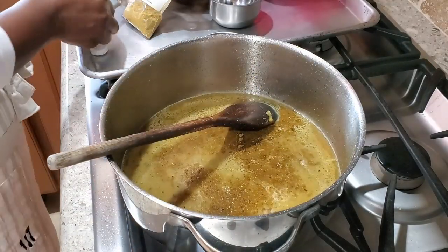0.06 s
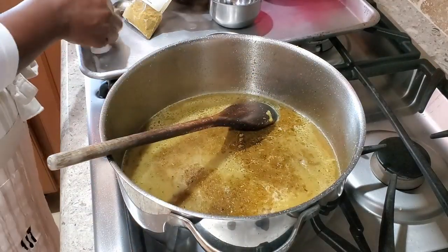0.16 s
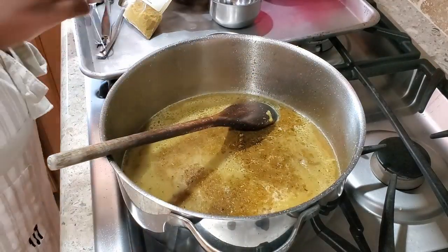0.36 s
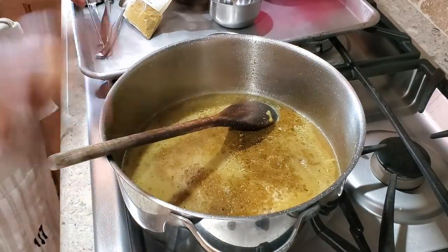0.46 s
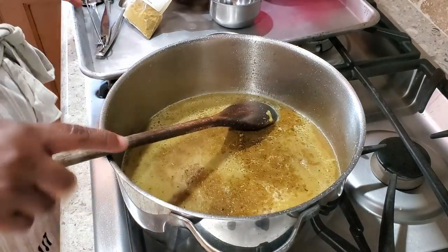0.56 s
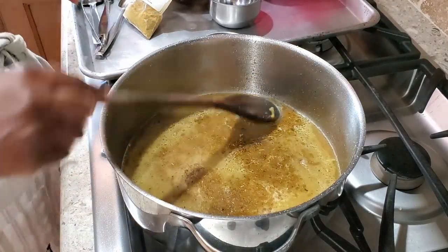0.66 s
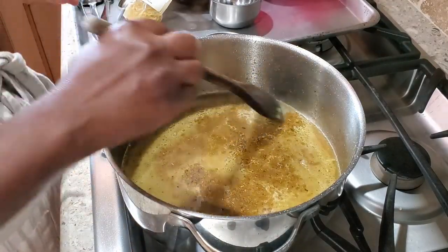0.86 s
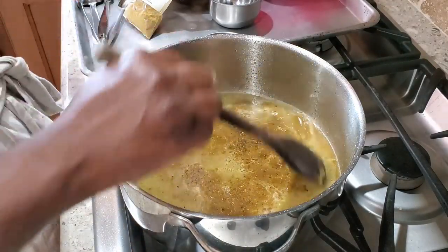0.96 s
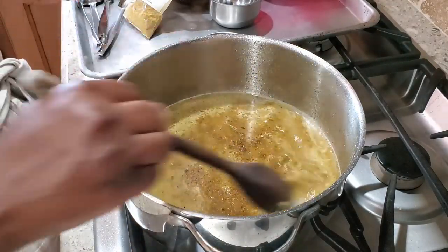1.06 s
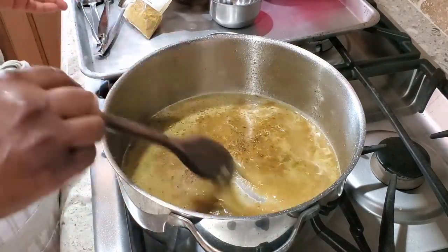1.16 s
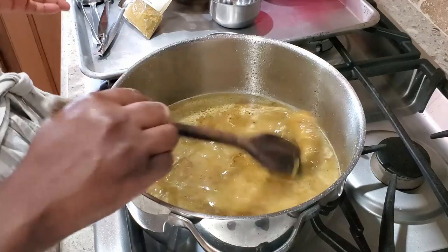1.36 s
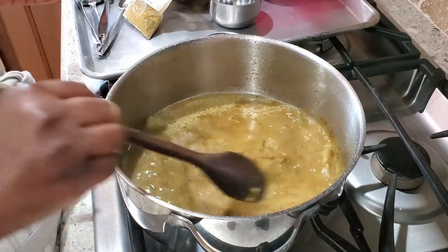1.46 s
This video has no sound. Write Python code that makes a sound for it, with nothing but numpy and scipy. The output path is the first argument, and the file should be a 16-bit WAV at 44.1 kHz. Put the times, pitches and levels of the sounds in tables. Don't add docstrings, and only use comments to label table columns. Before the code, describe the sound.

Close up in a reverberant kitchen, a sliding scrape fades, a wooden spoon bounces and drags against a metal pot, one bright crack rings the rim, then quiet swishes and small ticks over faint handling rumble.

```python
import sys
import numpy as np
from scipy import signal
from scipy.io import wavfile

SR = 44100
rng = np.random.default_rng(int(sys.argv[2]) if len(sys.argv) > 2 else 0)


def materialize(psi):
    bounded = np.clip(np.atleast_2d(psi).T, -1, 1)
    quanta = np.round(bounded * 32767).astype(np.int16)
    wavfile.write(sys.argv[1], SR, quanta)


def field_ratio(decibels):
    return 10 ** (np.asarray(decibels, dtype=float) / 20)


N = 66150


def curve(rows):
    seconds, *columns = np.transpose(rows)
    return [np.interp(np.arange(N) / SR, seconds, column) for column in columns]


def at_hz(points, hz):
    table_hz, values = np.transpose(points)
    return np.interp(np.log(hz), np.log(table_hz), values)


def unit(x):
    return x / np.sqrt(np.mean(x ** 2) + 1e-20)


def filtered(x, order, hz, kind="low"):
    return signal.sosfilt(signal.butter(order, hz, kind, fs=SR, output="sos"), x)


def bands(x):
    edges = 25 * 2 ** np.arange(0, 9.6, .5)
    out = []
    for k, (low, high) in enumerate(zip(edges, edges[1:])):
        band = signal.sosfilt(signal.butter(2, [low, high], "band", fs=SR, output="sos"), x + 1e-18)
        out.append((np.sqrt(low * high), (-1) ** k * band))
    return out


def colour(x, spectrum):
    return sum(field_ratio(at_hz(spectrum, hz)) * band for hz, band in bands(x))


def ring(x, hz, t60):
    r = field_ratio(-60 / (t60 * SR))
    w = 2 * np.pi * hz / SR
    return signal.lfilter([0, np.sin(w)], [1, -2 * r * np.cos(w), r * r], x + 1e-18)


def ring_all(force, modes, cycles, extra_s):
    out = 0
    for k, (hz, db, t60) in enumerate(modes):
        out = out + (-1) ** k * field_ratio(db) * ring(force, hz, min(t60, cycles / hz + extra_s))
    return out


def grains(rate):
    sign = rng.choice([-1, 1], N)
    return unit(sign * (rng.random(N) < rate / SR))


def diffuse(spectrum, size=N):
    # (frequency [Hz], likeness [0-1])
    likeness = [(40, .6), (80, .85), (150, .96), (300, .8), (600, .65), (1200, .1), (3000, .0)]
    out = 0
    for hz, (mid, side) in bands(rng.standard_normal((2, size))):
        alike = np.clip(at_hz(likeness, hz), 0, 1)
        stereo = np.sqrt(1 + alike) * mid + np.sqrt(1 - alike) * side * [[1], [-1]]
        out = out + spectrum(hz) * stereo
    return out


def pot(force):
    # (frequency [Hz], level [dB], fade time t60 [s])
    pot_modes = [(152, -8, 0.054), (200.4, -10, 0.075), (429.4, -9, 0.057), (539.2, 0.5, 0.023),
                 (578.6, -2, .07), (757, -3, 0.048), (895, 4, 0.022), (1014, -4, 0.044), (1140, 0.5, 0.021),
                 (1360, -2, 0.051), (1608, 9.5, 0.01), (2440, 11, 0.013), (2861, 11, 0.015),
                 (3576, 14.5, 0.01)]
    # (frequency [Hz], level [dB])
    clatter = [(250, -39.5), (500, -6.5), (1000, -20), (2500, -18), (4500, 10.5), (7000, -10),
               (11000, -11.5), (16000, -14)]
    return field_ratio(-30.5) * ring_all(force, pot_modes, 45, .005) + field_ratio(1.5) * colour(force, clatter)


def knocks():
    bounce_s = [.176, .2240, .266, .309, .353, .404, .44, .482]
    # (peak level [dB], contact length [s], bright share [dB])
    bounces = [
        (-41, 0.0029, -11.5),
        (-10, 0.0091, -17),
        (-36.5, .005, 7.5),
        (-26, 0.011, 3.5),
        (-20.5, .014, 3),
        (-18.5, 0.0095, 2.5),
        (-24.5, 0.0056, 7.5),
        (-33, 0.0074, 7.5),
    ]
    rough = grains(6000)
    t = np.arange(N) / SR
    soft, bright = np.zeros((2, N))
    for start, (db, length, bright_db) in zip(bounce_s, bounces):
        press = field_ratio(db) * (t >= start) * np.exp(-(np.maximum(t - start, 0) / length) ** 2)
        soft = soft + press
        bright = bright + field_ratio(bright_db) * press
    return filtered(soft * rough, 2, 1390) + bright * rough


def slide():
    # (time [s], level [dB])
    pressure = [(0, -39.5), (.04, -53), (.075, -61.5), (.11, -97.5), (.266, -86), (.274, -31), (.31, -26.5),
                (.345, -28.5), (.41, -24), (.44, -26), (.495, -31.5), (.52, -56.5), (.56, -90)]
    # (frequency [Hz], level [dB per Hz])
    hiss_colour = [(2000, -22), (4000, -14), (7000, -6), (10300, -9.5), (12500, -3), (14500, 3.5),
                   (16000, -1)]
    # (frequency [Hz], width [Hz], level [dB])
    shimmer = [(10300, 400, -3), (14400, 250, 0), (15350, 250, 0)]
    rough = grains(12000)
    lines = sum(field_ratio(db) * unit(ring(rough, hz, np.log(9) / width)) for hz, width, db in shimmer)
    hiss = filtered(colour(rough, hiss_colour), 2, 2500, "high")
    return field_ratio(curve(pressure)[0]) * (unit(hiss) + field_ratio(-15) * lines)


def drag():
    # (time [s], level [dB])
    push = [(0, -49), (.06, -67.5), (.075, -78.5), (.2, -80), (.27, -45.5), (.3, -41.5), (.45, -43.5),
            (.5, -53.5), (.53, -92)]
    force = field_ratio(curve(push)[0]) * unit(filtered(grains(1500), 2, 2000))
    return pot(force) + field_ratio(-33) * ring(force, hz=405, t60=0.052)


def tap():
    # (frequency [Hz], level [dB], fade time t60 [s])
    rim_modes = [(532.4, -9.5, 0.18), (833, -11.5, 0.18), (1067, -7, 0.043), (1484, -5, 0.039),
                 (2380, 2.5, 0.017), (2755, 6.5, 0.013), (3116, 12.5, 0.023), (3090, 4, 0.11),
                 (3337, 13.5, 0.017), (4040, 12.5, 0.013), (5760, -5, 0.061), (7040, -5, .02),
                 (9300, -20, .02), (14200, 4, .015)]
    # (frequency [Hz], level [dB])
    crack_colour = [(300, 2), (600, 8.5), (1500, 8.5), (2800, 16.5), (4500, 16), (8000, 9.5), (12000, 11),
                    (16000, 8)]
    tap_s, tap_db, crack_fade_s, crack_level = .7568, -13, 0.009, 0.025
    click = field_ratio(tap_db) * (np.arange(N) == int(tap_s * SR))
    fade = signal.lfilter([1], [1, -np.exp(-1 / (crack_fade_s * SR))], click)
    crack = click + crack_level * fade * rng.standard_normal(N)
    return field_ratio(-16) * ring_all(click, rim_modes, 70, .006) + colour(crack, crack_colour)


def stir():
    # (time [s], swish level [dB], hum level [dB])
    strokes = [
        (.95, -100.5, -98),
        (1.02, -87, -77),
        (1.09, -82, -80),
        (1.15, -100, -128),
        (1.23, -80, -95.5),
        (1.3, -85, -67),
        (1.315, -66, -84),
        (1.42, -73.5, -69),
        (1.5, -81.5, -73.5),
    ]
    # (frequency [Hz], level [dB per Hz])
    swish_colour = [(700, -3), (1500, -8.5), (2200, -7.5), (4000, -1.5), (7000, -6.5), (11000, -5),
                    (16000, -22)]
    swish_db, hum_db = curve(strokes)
    hum_hz, hum_width_hz = 577, 8
    hum = unit(ring(rng.standard_normal(N), hum_hz, np.log(9) / hum_width_hz))
    return field_ratio(swish_db) * unit(colour(grains(2100), swish_colour)) + field_ratio(hum_db) * hum


def ticks():
    touch_s = [1.018, 1.082, 1.222, 1.222, 1.312, 1.3595, 1.408, 1.475]
    # (peak level [dB], centre [Hz], length [s])
    touches = [
        (-61, 1200, .006),
        (-56.5, 5500, 0.0025),
        (-66, 6400, 0.015),
        (-70, 2050, 0.024),
        (-61.5, 6200, 0.016),
        (-47, 4460, 0.0032),
        (-54.5, 3320, 0.0031),
        (-59.5, 4700, 0.0046),
    ]
    t, noise = np.arange(N) / SR, rng.standard_normal(N)
    out = np.zeros(N)
    for start, (db, hz, length) in zip(touch_s, touches):
        fade = (t >= start) * np.exp(-np.maximum(t - start, 0) / length)
        out += field_ratio(db) * fade * unit(ring(noise, hz, np.log(9) * length / 5))
    return out


def kitchen(x):
    # (frequency [Hz], fade time t60 [s])
    room = [(150, 0.6), (500, 0.39), (1500, 0.49), (3500, 0.38), (8000, 0.42), (15000, 0.17)]
    t = np.arange(SR // 2) / SR
    early = field_ratio(7 - 60 * t / .08)
    echo = diffuse(lambda hz: field_ratio(-60 * t / at_hz(room, hz)) + early, size=len(t))
    echo = echo * (1 - np.exp(-t / 0.00033))
    echo = echo / np.sqrt(np.sum(echo ** 2, axis=1, keepdims=True))
    return signal.fftconvolve(x[None], echo, axes=1)[:, :N]


def rumble():
    # (time [s], level [dB])
    handling = [(0.0, -44), (0.066, -43), (0.208, -63), (0.246, -51), (0.284, -69), (0.408, -41.5),
                (0.55, -82), (0.564, -59), (0.718, -65), (0.734, -55), (0.88, -50.5), (0.956, -65),
                (1.098, -61), (1.164, -98), (1.386, -95), (1.5, -89.5)]
    # (frequency [Hz], level [dB per Hz])
    rumble_colour = [(25, -32.5), (45, -12.5), (70, -7.5), (95, 1), (130, -13.5), (200, -17), (350, -39.5),
                     (1000, -105)]
    return field_ratio(curve(handling)[0]) * unit(diffuse(lambda hz: field_ratio(at_hz(rumble_colour, hz))))


def room_noise():
    # (frequency [Hz], level [dB])
    noise_colour = [(59, -33.5), (100, -7), (266, -7), (891, -21), (2930, -25), (7770, -25), (10000, -20),
                    (16000, -48)]
    return field_ratio(-69.5) * unit(diffuse(lambda hz: field_ratio(at_hz(noise_colour, hz))))


def scene():
    bounced, dragged_and_tapped, rubbed = pot(knocks()), drag() + tap(), slide() + stir()
    small = ticks()
    near = bounced + dragged_and_tapped + rubbed
    wet = kitchen(bounced) + kitchen(dragged_and_tapped) + kitchen(rubbed + field_ratio(-14) * small)
    lag_s = .00012
    direct = np.array([near, np.roll(near, int(lag_s * SR))]) + small
    return direct + field_ratio(6) * wet + rumble() + room_noise()


def roll_off(x):
    return signal.sosfilt(signal.butter(12, 16980, fs=SR, output="sos"), x)


def record(dry):
    x = filtered(dry, 3, 45, "high")
    rounded = np.tanh(x / 2) * 2
    mix = signal.sosfilt(signal.ellip(8, .5, 45, 15850, fs=SR, output="sos"), rounded)
    return roll_off(mix)


dry = scene()
out = record(dry)
materialize(out)
```